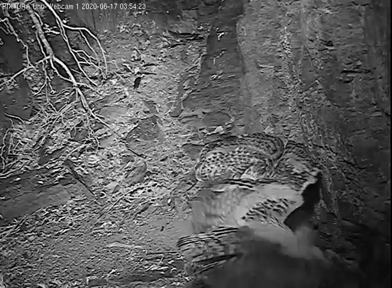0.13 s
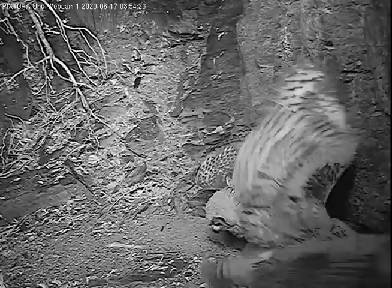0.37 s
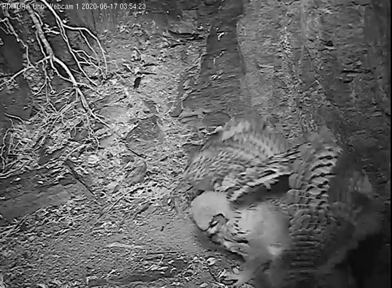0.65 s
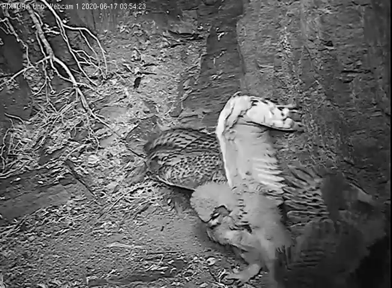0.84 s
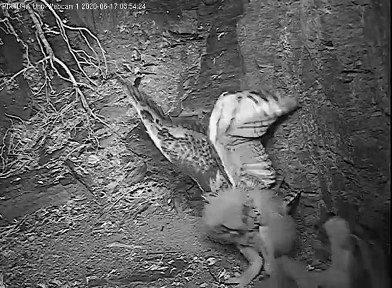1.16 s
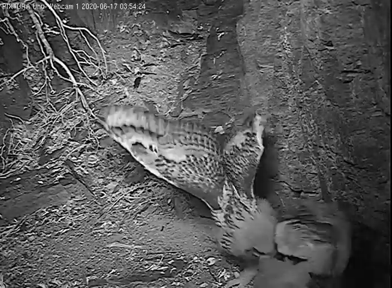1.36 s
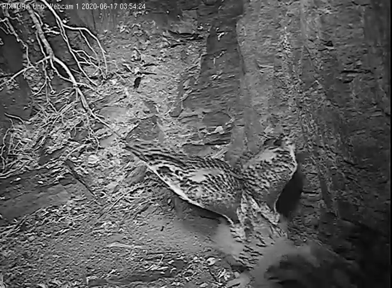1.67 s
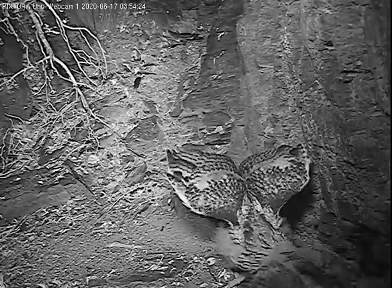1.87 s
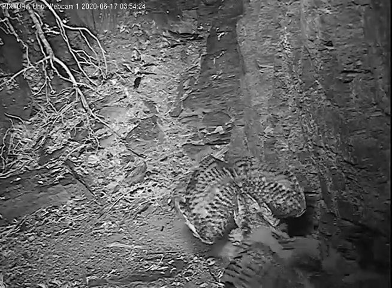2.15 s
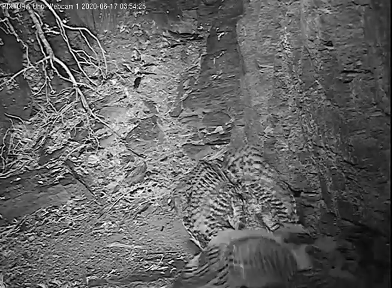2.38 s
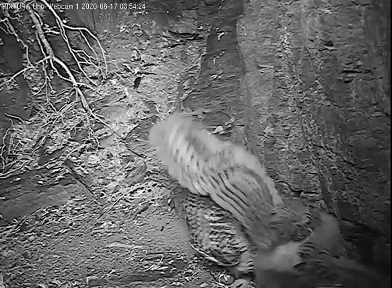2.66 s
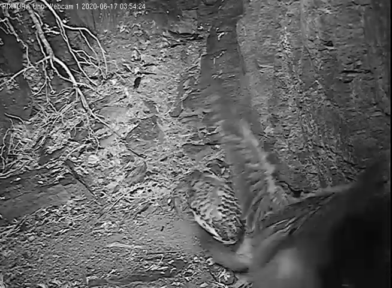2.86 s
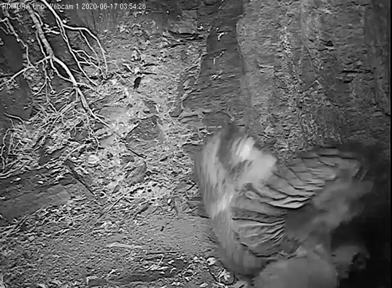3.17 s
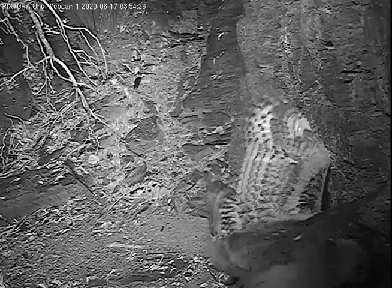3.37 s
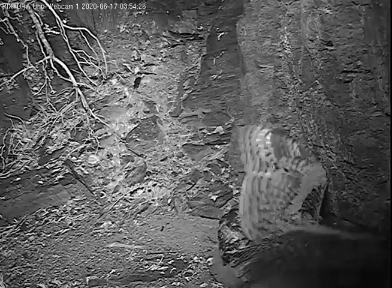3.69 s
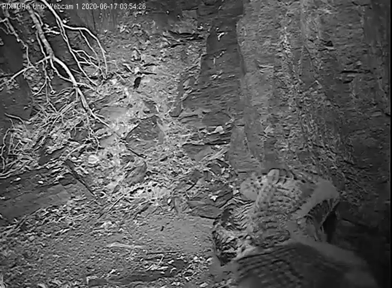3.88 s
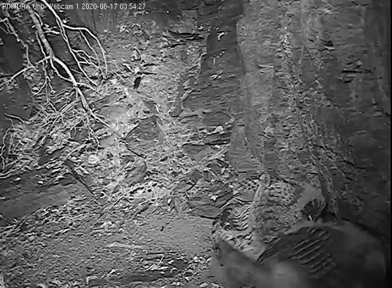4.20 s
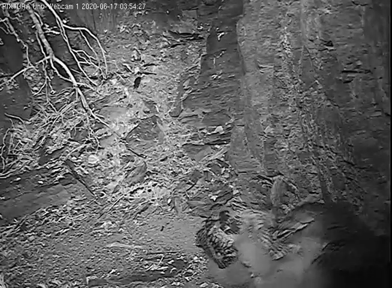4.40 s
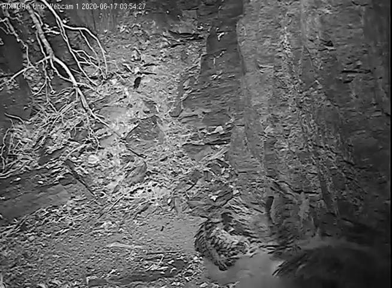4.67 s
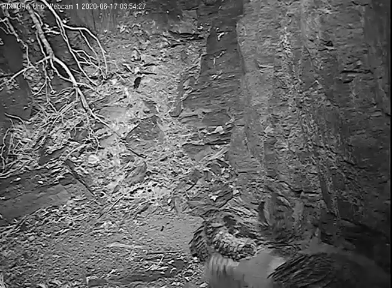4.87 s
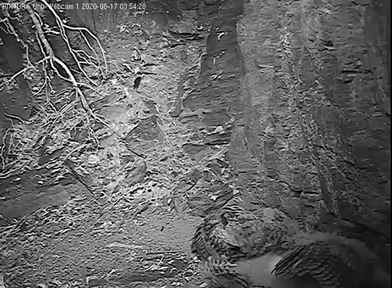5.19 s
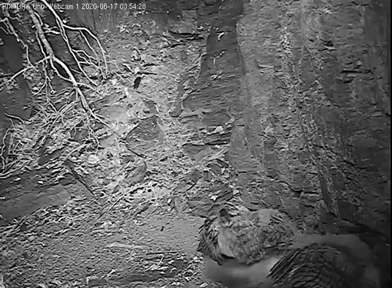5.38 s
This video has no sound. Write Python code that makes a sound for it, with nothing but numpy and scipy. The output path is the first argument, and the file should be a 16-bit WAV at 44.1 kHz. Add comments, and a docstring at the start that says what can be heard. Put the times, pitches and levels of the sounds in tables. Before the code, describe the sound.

In a small rocky nest hollow at night, owls scuffle: soft wing puffs, gritty brushing and one sharp stone knock. A few tiny peeps follow, then a long bout of rapid, piercing, swooping chitter that roughens into a screech. Two shorter bouts follow after gaps. A fixed camera microphone nearby picks up low hum, faint hiss and short, close wall reflections.

```python
"""Steady low hum, night air, microphone hiss and mains lines: filtered noise and sines, throughout.
Young owls scuffle in a rocky hollow, mostly early: wing puffs and gravel brushes (noise), stone knocks
(modes); puffs and knocks recur later. Peeps and arching whistles (near-pure tones) come before and among
three bouts of chitter: swooping notes that rasp and rise again (roughened tones, hiss), each bout ending
in a screech; a faint whine precedes the last. Close rock walls reflect all the owls' sounds."""
import sys
import numpy as np
from scipy import signal
from scipy.fft import rfft, irfft
from scipy.io import wavfile

SR = 44100
rng = np.random.default_rng(int(sys.argv[2]) if len(sys.argv) > 2 else 0)


def store_pcm(level_fs):
    """Save levels as 16-bit WAV."""
    pcm = np.round(np.clip(level_fs, -1, 1) * 32767).astype(np.int16)
    wavfile.write(sys.argv[1], SR, np.atleast_2d(pcm).T)


N = 244314
TIME = np.arange(N) / SR

# All levels below are relative: filters and mix gains follow.
# low hum: spectrum (f/Hz, density/dB per Hz); course (t/s, level/dB)
HUM = [(12, -25.5), (28, -27), (48, -1), (86, 2.5), (118, -6.5), (145, -2), (192, -6), (218, -20),
       (320, -28), (700, -79.5)]
HUM_LEVEL = [(0.0, -41), (0.12, -41.5), (1.83, -42), (2.78, -36), (2.87, -40.5), (4.17, -37), (5.54, -40.5)]
# night air: spectrum (f/Hz, density/dB per Hz); course (t/s, level/dB)
NIGHT_AIR = [(100, -8.5), (240, 1.5), (330, 0), (450, 2), (530, -5.5), (640, -6.5), (730, -9.5),
             (1200, -13.5), (2000, -17.5), (4000, -33.5), (8000, -50.5)]
NIGHT_AIR_LEVEL = [(0.0, -53), (1.8, -56), (5.06, -54.5), (5.54, -51.5)]
# microphone hiss: (f/Hz, density/dB per Hz)
MIC_HISS = [(300, -4.5), (1500, 4), (3000, 3.5), (5300, 0.5), (7200, -0.5), (8200, -11), (8800, -30)]
# faint mains lines: (f/Hz, level/dB)
MAINS = [(550, -72.5), (650, -72.5), (750, -73.5), (850, -73.5)]
# wing beats pushing air: (t/s, rise/s, t60/s, level/dB)
WING_BEATS = [(0.261, 0.019, 0.24, -44), (0.829, 0.017, 0.063, -42.5), (2.719, 0.075, 0.19, -39.5),
              (4.15, 0.039, 0.38, -42)]
# spectrum of the wing puffs: (f/Hz, density/dB per Hz)
WING_AIR = [(40, -10), (130, 4), (270, 4), (450, -6), (900, -22), (2500, -47)]
# feathers and claws on gravel: (t/s, rise/s, t60/s, level/dB, tilt/dB per octave well above 500 Hz)
SCRAPES = [(0.276, 0.0033, 0.025, -48, 1.5), (0.34, 0.032, 0.97, -56.5, 0), (0.525, 0.011, 1, -58, 5.5),
           (0.604, 0.0037, 0.087, -40, 6), (0.836, 0.0038, 0.54, -55, 4.5), (1.015, 0.0064, 0.041, -57, 9),
           (1.075, 0.0049, 0.042, -51, 13.5)]
# spectrum of brushed gravel before tilt: (f/Hz, density/dB per Hz)
GRAVEL = [(200, -6), (700, 10), (1500, 14), (2500, 9.5), (4000, -3.5), (5300, -2), (7000, -11), (8800, -35)]
# knocks on stone: (t/s, peak level/dB, tilt/dB per octave)
KNOCKS = [(0.277, -38, -30), (0.316, -34.5, 11), (0.415, -41.5, 8), (0.487, -21, 4), (2.726, -39.5, 8.5),
          (2.789, -41.5, 6), (3.285, -38, -4.5)]
# stone modes: (f/Hz, level/dB, t60/s)
STONE_MODES = [(456, 6, 0.02), (594, 10.5, 0.012), (646, 4.5, 0.035), (971, -12, 0.034),
               (1196, -15.5, 0.057), (1443, -6, 0.031), (1585, -1, 0.027), (1850, -5, 0.029),
               (2030, -13, 0.048), (2337, -5.5, 0.023), (2670, -10.5, 0.018)]
# peeps, held then flicked upward: (t/s, length/s, f/Hz, level/dB)
PEEPS = [(0.645, .045, 2420, -57), (1.155, 0.056, 2234, -45.5), (1.276, 0.045, 2240, -52)]
# thin arching whistles: (t/s, length/s, top f/Hz, level/dB, roughness/0-1)
ARCHES = [(1.495, 0.16, 3155, -54, .08), (1.69, .062, 3033, -52.5, 0.7), (2.488, 0.036, 5080, -50.5, 0),
          (2.564, 0.049, 5380, -55, 0.3), (2.673, .066, 5590, -54, 0.3), (2.762, .036, 5170, -53.5, .2),
          (3.508, 0.06, 3180, -55, 0.7), (3.618, 0.062, 2780, -51, 0.4), (4.788, 0.069, 2886, -44.5, 0.23),
          (4.876, 0.07, 3327, -46.5, .2), (4.881, 0.065, 2930, -46, 0)]
# wavering whine before the last bout: (t/s, f/Hz, level/dB)
WHINE = [(4.5, 2130, -56), (4.516, 2496, -63.5), (4.586, 1993, -65), (4.656, 2065, -60), (4.7, 1800, -69),
         (4.754, 2210, -63), (4.78, 2090, -57)]
# chitter notes: (t of crest/s, time to upturn/s, f/Hz, whistle level/dB, rasp level/dB)
NOTES = [(1.762, 0.029, 2938, -32, -51.5), (1.865, 0.034, 3192, -35.5, -46),
         (1.948, 0.033, 3526, -33.5, -45), (2.032, 0.027, 3418, -35, -41), (2.122, 0.018, 2880, -33.5, -43),
         (2.204, 0.027, 3195, -39.0, -36), (2.292, 0.027, 3240, -37.5, -39.5),
         (2.382, 0.024, 3310, -32.5, -41.5), (2.465, 0.031, 3530, -32.5, -45),
         (2.548, 0.033, 3450.0, -31.5, -40), (2.628, 0.032, 4260, -41, -40.5),
         (2.708, 0.049, 4420, -43, -48), (2.794, 0.033, 4140, -37.5, -41), (2.884, 0.026, 4560, -27.5, -41),
         (2.967, 0.025, 4030, -32.5, -41.5), (3.047, 0.039, 3080.0, -38.5, -43),
         (3.579, 0.05, 2940, -36, -51), (3.68, 0.051, 2524, -38.5, -51), (3.779, 0.054, 3060, -33.5, -47.0),
         (3.87, 0.046, 3124, -35, -48), (3.96, 0.053, 3085, -39.5, -45), (4.06, 0.044, 3156, -45.0, -46),
         (4.145, 0.044, 2900.0, -40, -47), (4.943, 0.028, 3160, -37.5, -42.5),
         (5.027, 0.039, 3014, -33.5, -46.5), (5.117, 0.034, 3125, -37.5, -46.5),
         (5.205, 0.061, 3050, -32, -50.5), (5.296, 0.052, 3116, -34.5, -47)]
# bouts of chitter: (start t/s, end t/s, lead-in/s, greatest rise of the top above note f/Hz, longest sink/s,
# fall roughness/0-1, first rasp roughness/0-1, last rasp roughness/0-1)
BOUTS = [(1.7, 3.083, .013, 724, 0.0092, 0.26, 0.58, 1.0),
         (3.5, 4.167, 0.011, 240.8, 0.016, 0.13, 0.88, 1.0), (4.9, 5.332, .014, 300, .017, 0.15, 1, 1)]
# air hissing through the open bill: (f/Hz, density/dB per Hz)
BILL_HISS = [(600, -40.5), (1350, 1.5), (2000, 7), (3200, 5), (5100, 8), (6000, 3), (8800, -27)]
# harsh screeches at bout edges: (t/s, length/s, f at mid-length/Hz, level/dB)
SCREECHES = [(2.968, 0.025, 2250, -46), (3.043, 0.0493, 2762, -35.5), (3.463, 0.054, 2114, -49.5),
             (4.171, 0.053, 2396, -51.5), (5.326, .06, 2617, -41)]
# throat response: (f/Hz, gain/dB)
THROAT = [(1400, -2.5), (2000, -2), (2500, 0), (2950, -2.5), (3230, 2.5), (3450, -4), (3760, 1.5),
          (4000, -4), (4600, 0), (5250, 2.5), (5600, -7), (7200, 5.5), (8600, -2)]
# reverberation of the hollow: (f/Hz, t60/s)
HOLLOW = [(300, 0.068), (1500, 0.13), (3000, 0.15), (8000, 0.083)]
# near-wall reflections: (delay/s, level/dB)
WALLS = [(.0028, -12), (.0053, -14.5), (.0066, -20), (.0098, -26.5), (0.0126, -35.5)]

# peep: flick climb; catch in the voice just before it, place and width as shares of the length
FLICK_HZ, CATCH_DB, CATCH_AT, CATCH_WIDTH = 694, -36, 0.51, 0.14
# arch: share of the length at the top, climb to it, drop after it
ARCH_PEAK, ARCH_RISE_HZ, ARCH_SAG_HZ = 0.38, 703, 465
WHINE_DB, WHINE_OCTAVE_DB = 2.5, -13
# chitter: top re whistle level; upturn and end re rasp level; outer fades re top and end
TOP_DB, UPTURN_DB, END_DB, EDGE_DB = -11.5, 3, -8.5, -14.5
TOP_ROUGH, END_ROUGH = 0.65, 0.56
EDGE_S, TURN_S = 0.009, 0.00832
ATTACK_S, CREST_S = 0.0049, 0.0034  # jump to the crest partway down the fall; brief hold
DIP_RATIO, END_HZ = 0.8, 250  # dip as a share of note pitch; end above note pitch, when not tired
CEILING_HZ = 4770  # no note's top is higher
WARM_S = 0.149  # first note of a bout is shallower and cleaner
TIRE_S, TIRED_SAG_HZ = 0.23, 300.6  # late notes sag and climb less
SECOND_DB, SECOND_ROUGH = -11, 0.5  # other side of the syrinx, holding the top pitch
THIN_HZ, THIN_DB_PER_HZ = 4130, -0.0003  # slight thinning of the tone above this pitch
SCREECH_SAG_HZ_PER_S = 4100
BAND_LIMIT_HZ = 8750


def gain_of(db):
    """Decibels to amplitude."""
    return 10 ** (np.asarray(db) / 20)


def evened(x):
    """Scales to rms 1."""
    return x / np.sqrt(np.mean(x ** 2) + 1e-20)


def read(points, hz):
    """Interpolates a spectrum on a log-frequency axis."""
    f, value = np.transpose(points)
    return np.interp(np.log(hz + 1), np.log(f + 1), value)


def level(curve):
    """A dB curve as a gain for every sample."""
    return gain_of(np.interp(TIME, *np.transpose(curve)))


def samples(start_s, end_s):
    """Sample numbers between two times."""
    return np.arange(round(start_s * SR), round(end_s * SR))


def add(mix, s, sound):
    """Adds a sound into the mix at time s."""
    part = mix[max(round(s * SR), 0):][:len(sound)]
    part += sound[:len(part)]


def coloured(x, spectrum, tilt_db=0):
    """Filters by a spectrum plus a tilt that nears dB per octave well above 500 Hz."""
    hz = np.fft.rfftfreq(N, 1 / SR)
    gain_db = read(spectrum, hz) + tilt_db * np.log2(1 + hz / 500)
    return irfft(rfft(x) * gain_of(gain_db), N)


def noise(spectrum, tilt_db=0):
    """Gaussian noise of rms 1 with a given spectrum."""
    return evened(coloured(rng.standard_normal(N), spectrum, tilt_db))


def flutter(rate_hz):
    """Smooth random motion of rms 1, up to about the given rate."""
    hz = np.fft.rfftfreq(N, 1 / SR)
    lowpass = 1 / (1 + (hz / rate_hz) ** 2)
    return evened(irfft(rfft(rng.standard_normal(N)) * lowpass, N))


def background(air_db=1, mic_hiss_db=-64):
    """Low hum, night air and microphone hiss as shaped noise; mains lines as sines of random phase."""
    hum = level(HUM_LEVEL) * noise(HUM)
    air = gain_of(air_db) * level(NIGHT_AIR_LEVEL) * noise(NIGHT_AIR)
    mic_hiss = gain_of(mic_hiss_db) * noise(MIC_HISS)
    lines = sum(gain_of(db) * np.sqrt(2) * np.sin(2 * np.pi * (hz * TIME + rng.random()))
                for hz, db in MAINS)
    return hum + air + mic_hiss + lines


def stroke(s, rise_s, t60_s):
    """An envelope that swells linearly to 1 and dies away exponentially."""
    swell = np.clip((TIME - s) / rise_s, 0, 1)
    return swell * 1e-3 ** (np.maximum(TIME - s - rise_s, 0) / t60_s)


def scuffle(grain_db=4):
    """Wing puffs are low noise; gravel brushes are noise made grainy by fast random gain."""
    puffs = sum(gain_of(db) * stroke(s, rise_s, t60_s) for s, rise_s, t60_s, db in WING_BEATS)
    grains = evened(gain_of(grain_db * flutter(300)))
    brushes = sum(gain_of(db) * stroke(s, rise_s, t60_s) * noise(GRAVEL, tilt_db)
                  for s, rise_s, t60_s, db, tilt_db in SCRAPES)
    return grains * brushes + puffs * noise(WING_AIR)


def stone_ring(tilt_db, contact_s=0.0018):
    """Decaying stone modes of peak 1; the dull thud comes first, higher modes build up just after."""
    t = np.arange(SR // 5) / SR
    ring = np.zeros(len(t))
    for k, (hz, mode_db, t60_s) in enumerate(STONE_MODES):
        decay = gain_of(mode_db + tilt_db * np.log2(hz / 1000) - 60 * t / t60_s)
        build_up = 1 - np.exp(-t / (contact_s * (hz / 1000) ** 2))
        ring += (-1) ** k * decay * build_up * np.sin(2 * np.pi * hz * t)
    return ring / abs(ring).max()


def knocks(rattle_db=-9, rattle_delay_s=0.004084):
    """A claw tips a stone, which rings briefly and touches down once more."""
    out = np.zeros(N)
    for s, db, tilt_db in KNOCKS:
        ring = gain_of(db) * stone_ring(tilt_db)
        add(out, s, ring)
        add(out, s + rattle_delay_s, gain_of(rattle_db) * ring)
    return out


def syrinx(hz, rough, chance, octave_db=-17, jitter=0.069, tremor=0.012, doubling=0):
    """A nearly pure tone; roughness jitters pitch and randomises swing; doubling adds an octave below."""
    wobble, real, imaginary = chance
    phase = 2 * np.pi * np.cumsum(hz * (1 + (tremor + jitter * rough) * wobble)) / SR
    swing = np.sqrt(1 - rough ** 2) + rough * (real + 1j * imaginary) / np.sqrt(2)
    # low, rough notes carry the strongest overtone
    octave = gain_of(octave_db) * (1 + rough) / (1 + (hz / 2900) ** 8)
    wave = swing * (np.exp(1j * phase) + octave * np.exp(2j * phase))
    wave = wave + doubling * swing.conj() * np.exp(0.5j * phase)
    return np.sqrt(2) * wave.real


def whistles(clean_rough=0.08, taper=0.11):
    """Thin syrinx tones: peeps, arches and a whine; two arches can overlap, one from each side."""
    out = np.zeros(N)
    chance = np.array([flutter(120), flutter(250), flutter(250)])

    def sing(at, hz, db, rough=clean_rough, octave_db=-15):
        """Adds one tone with soft ends."""
        tone = syrinx(hz, rough, chance[:, at], octave_db=octave_db, jitter=0.055, tremor=0.016)
        add(out, at[0] / SR, gain_of(db) * tone * signal.windows.tukey(len(at), taper))

    for s, length_s, hz, db in PEEPS:
        at = samples(s, s + length_s)
        u = np.linspace(0, 1, len(at))
        catch_db = CATCH_DB * np.exp(-((u - CATCH_AT) / CATCH_WIDTH) ** 2)
        sing(at, hz + FLICK_HZ * u ** 5, db + catch_db, octave_db=-17.5)
    for s, length_s, top_hz, db, rough in ARCHES:
        at = samples(s, s + length_s)
        side = np.interp((at / SR - s) / length_s, [0, ARCH_PEAK, 1], [-1, 0, 1])
        sing(at, top_hz - np.where(side < 0, ARCH_RISE_HZ, ARCH_SAG_HZ) * side ** 2, db, rough)
    s, hz, db = np.transpose(WHINE)
    at = samples(s[0], s[-1])
    whine_db = np.interp(at / SR, s, db) + WHINE_DB
    sing(at, np.interp(at / SR, s, hz), whine_db, octave_db=WHINE_OCTAVE_DB)
    return out


def hoarse_voice(wobble_hz=380, swing_hz=400, burst_hz=160):
    """Random motion of a hoarse voice: pitch wobble, complex swing, bursts, two colours of hiss."""
    return np.array([flutter(wobble_hz), flutter(swing_hz), flutter(swing_hz), flutter(burst_hz),
                     noise(BILL_HISS), noise(BILL_HISS, tilt_db=10)])


def thinning(hz):
    """Gain of the tone, which falls slightly at the top of the voice."""
    return gain_of(THIN_DB_PER_HZ * np.maximum(hz - THIN_HZ, 0))


def rasp(hz, rough, chance, doubling, hiss_db=-14, shrill_db=-10, burst_db=10):
    """Syrinx tone plus air hiss; random bursts of the tone are strongest at half roughness."""
    bursts, air, shrill = chance[3:]
    tone = syrinx(hz, rough, chance[:3], octave_db=-20, jitter=0.068, tremor=0.014, doubling=doubling)
    burst_gain = gain_of((1 + burst_db * rough * (1 - rough)) * bursts)
    hiss = gain_of(hiss_db) * rough * air
    # high, hoarse notes hiss more shrilly
    hiss = hiss + gain_of(shrill_db) * rough ** 2 * (hz.mean() / 3800) ** 4 * shrill
    return burst_gain * thinning(hz) * tone + hiss


def chitter_note(note, bout, chance, doubling, lead_db, crest_db):
    """Start time and sound of one note: tips over from its top, breaks into rasp, turns up again."""
    s, length_s, pitch_hz, db, rasp_db = note
    first, last, lead_s, above_hz, sink_s, fall_rough, first_rough, last_rough = bout
    top, upturn = s - lead_s, s + length_s
    low, turn, end = s + min(sink_s, length_s / 2), upturn - TURN_S, upturn + TURN_S
    at = samples(top - EDGE_S, end + EDGE_S)
    t = at / SR
    vigour = min((last - s) / TIRE_S, 1)
    warmth = min((s - first) / WARM_S, 1)

    top_hz = min(pitch_hz + warmth * above_hz, CEILING_HZ)
    dip_hz = DIP_RATIO * pitch_hz - TIRED_SAG_HZ * (1 - vigour)
    end_hz = dip_hz + vigour * (pitch_hz + END_HZ - dip_hz)
    hz = np.interp(t, [top, s, low, turn, end], [top_hz, pitch_hz, dip_hz, dip_hz, end_hz])

    loud_t = [t[0], top, s - ATTACK_S, s - CREST_S / 2, s + CREST_S / 2,
              low, turn, upturn, end, t[-1]]
    loud_db = [db + TOP_DB + EDGE_DB, db + TOP_DB, db + lead_db, db + crest_db, db + crest_db,
               rasp_db, rasp_db, rasp_db + UPTURN_DB, rasp_db + END_DB, rasp_db + END_DB + EDGE_DB]
    loud = gain_of(np.interp(t, loud_t, loud_db))

    dip_rough = np.interp(s, [first, last], [first_rough, last_rough])
    rough_t = [top, s, (s + low) / 2, low + TURN_S / 2, turn, upturn]
    rough = np.interp(t, rough_t, [TOP_ROUGH, warmth * fall_rough, fall_rough,
                                   dip_rough, dip_rough, END_ROUGH])
    rough = np.clip(rough, 0, 1)

    main = loud * rasp(hz, rough, chance[:, at], doubling * rough ** 3)
    # time-reversed random motion sets the second side apart
    second = syrinx(top_hz, SECOND_ROUGH, chance[:3, at[::-1]])
    second = gain_of((db + rasp_db) / 2 + SECOND_DB) * thinning(top_hz) * second
    window = signal.windows.tukey
    return t[0], main * window(len(at), 0.1) + second * window(len(at), 0.5)


def chitter(doubling=0.24, lead_db=-8, crest_db=-0.5):
    """Bouts of swooping notes; rasp coarsens through the first two, stays fully rough in the third."""
    out, chance = np.zeros(N), hoarse_voice()
    for bout in BOUTS:
        for note in NOTES:
            if bout[0] <= note[0] <= bout[1]:
                add(out, *chitter_note(note, bout, chance, doubling, lead_db, crest_db))
    return out


def screeches(rough=0.82, doubling=0.28, taper=0.48):
    """A sagging rasp whose period doubles, adding a band an octave below."""
    out, chance = np.zeros(N), hoarse_voice(wobble_hz=510, swing_hz=420)
    for s, length_s, pitch_hz, db in SCREECHES:
        at = samples(s, s + length_s)
        hz = pitch_hz - SCREECH_SAG_HZ_PER_S * (at / SR - s - length_s / 2)
        sound = rasp(hz, rough, chance[:, at], doubling, hiss_db=-17.5, burst_db=5)
        add(out, s, gain_of(db) * sound * signal.windows.tukey(len(at), taper))
    return out


def hollow(x, tail_db=-9, tail_rise_s=0.0023):
    """Direct sound, a few reflections off near rock, and a short diffuse tail decaying per frequency."""
    hz, t, z = signal.stft(rng.standard_normal(SR // 3), SR, nperseg=256)
    decay = gain_of(-60 * t / read(HOLLOW, hz)[:, None])
    tail = signal.istft(z * decay, SR, nperseg=256)[1]
    tail *= np.clip(np.arange(len(tail)) / SR / tail_rise_s, 0, 1)
    response = gain_of(tail_db) * tail / np.linalg.norm(tail)
    response[0] += 1
    for delay_s, db in WALLS:
        add(response, delay_s, gain_of([db]))
    return signal.fftconvolve(x, response)[:N]


def scene(chitter_db=-2.5, screech_db=0.5):
    """Owls in their hollow, over the background; the throat filters all voices."""
    voice = whistles() + gain_of(chitter_db) * chitter() + gain_of(screech_db) * screeches()
    owls = scuffle() + knocks() + coloured(voice, THROAT)
    return (background() + hollow(owls))[None]


def record(dry):
    """The nest camera's band limit: a linear-phase low-pass."""
    lowpass = signal.firwin(401, BAND_LIMIT_HZ, window=("kaiser", 9), fs=SR)
    return signal.oaconvolve(dry, lowpass[None], "same")


dry = scene()
out = record(dry)
store_pcm(out)
```